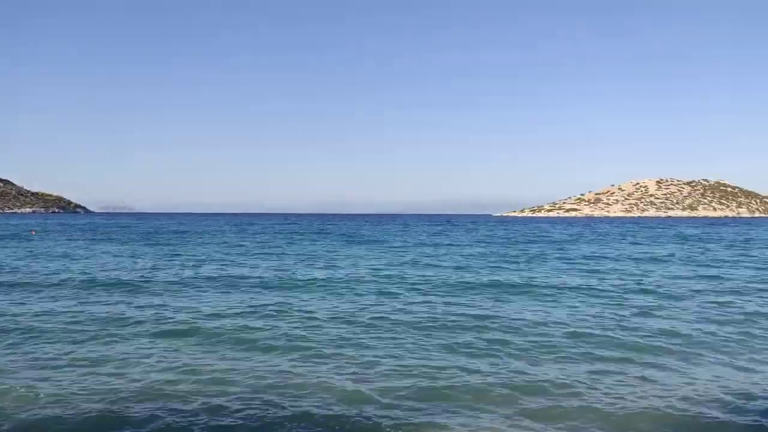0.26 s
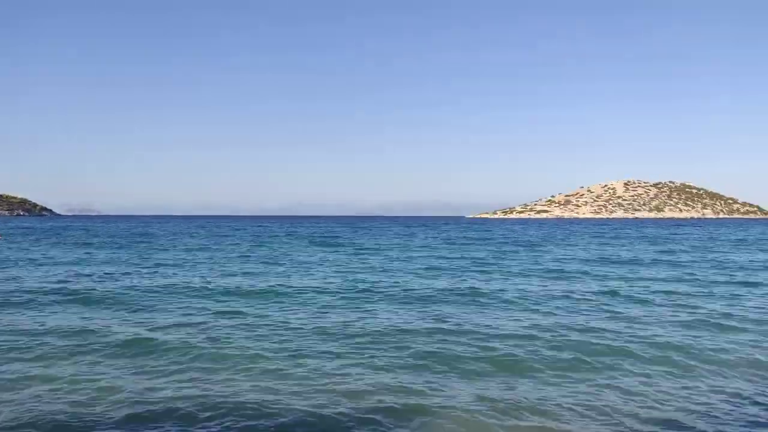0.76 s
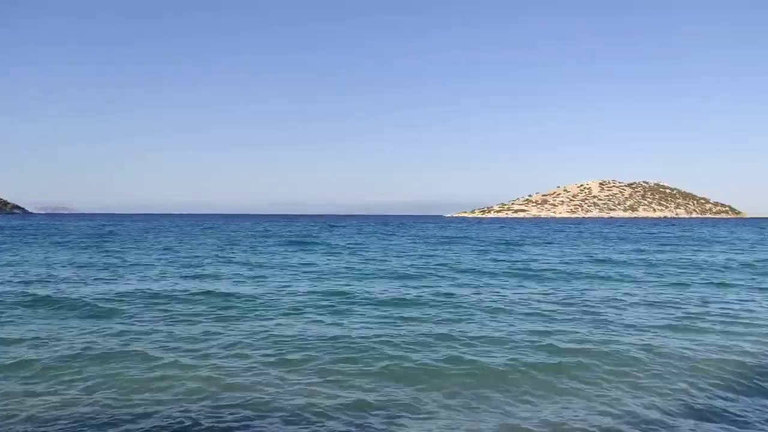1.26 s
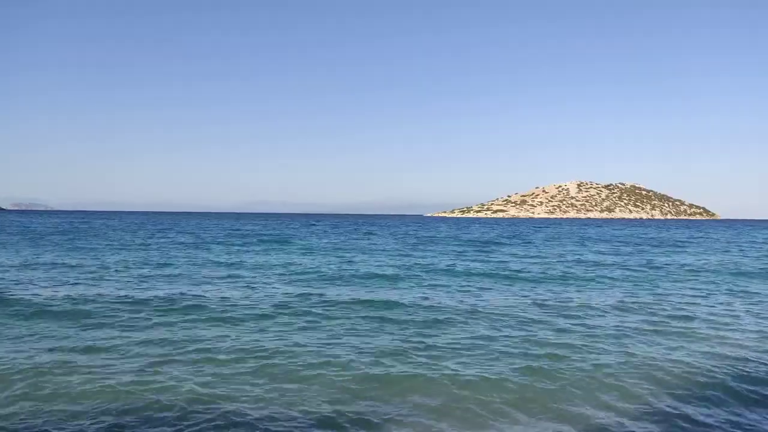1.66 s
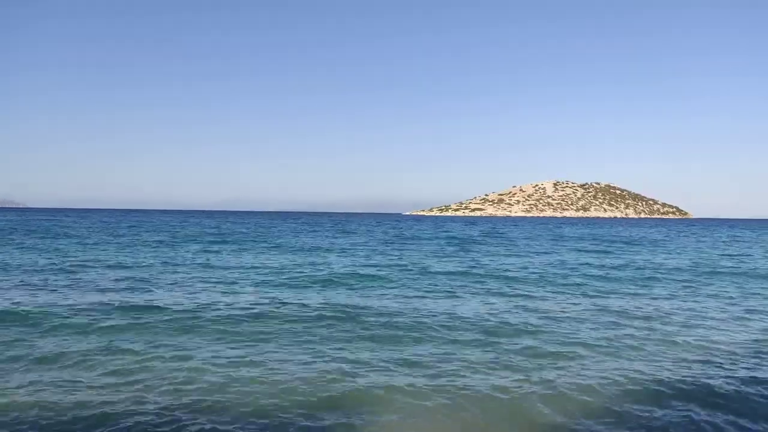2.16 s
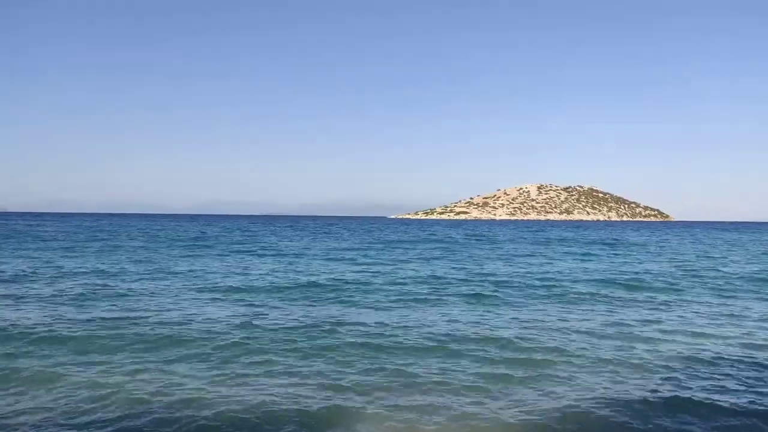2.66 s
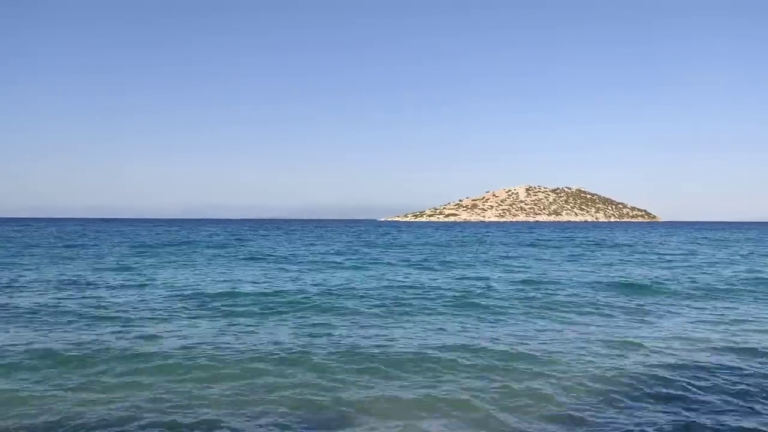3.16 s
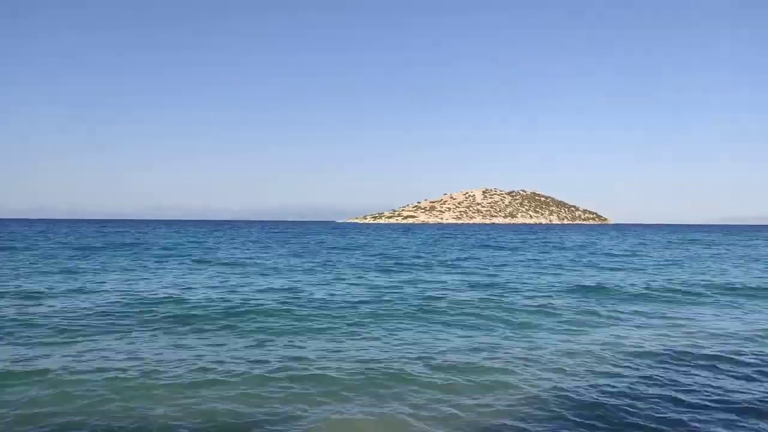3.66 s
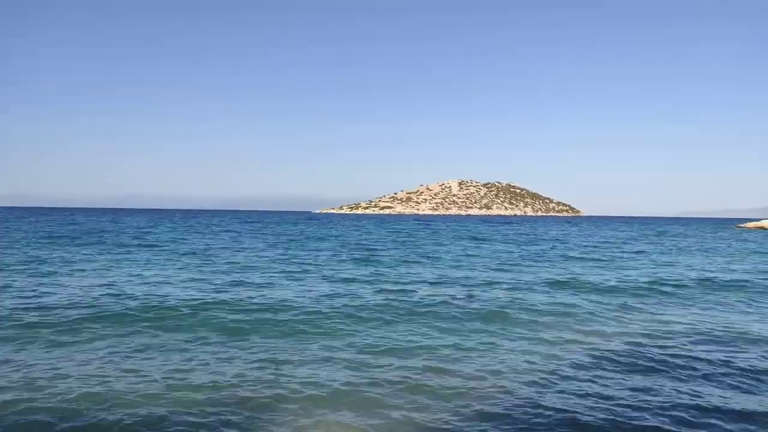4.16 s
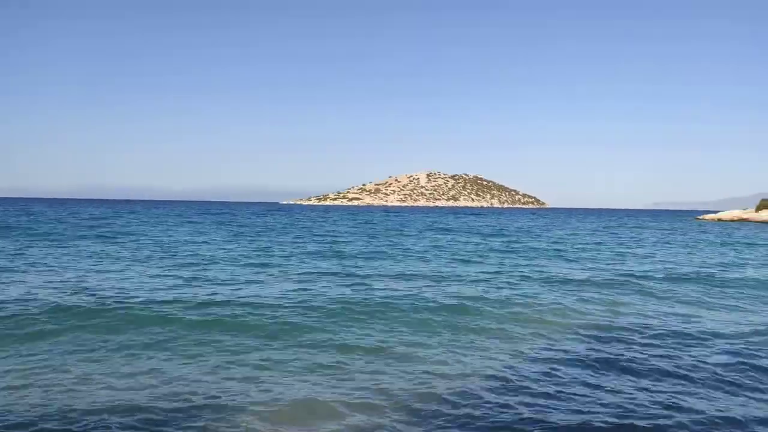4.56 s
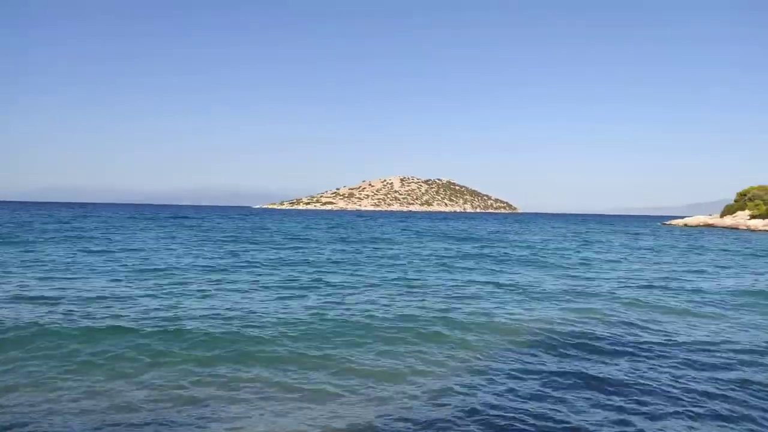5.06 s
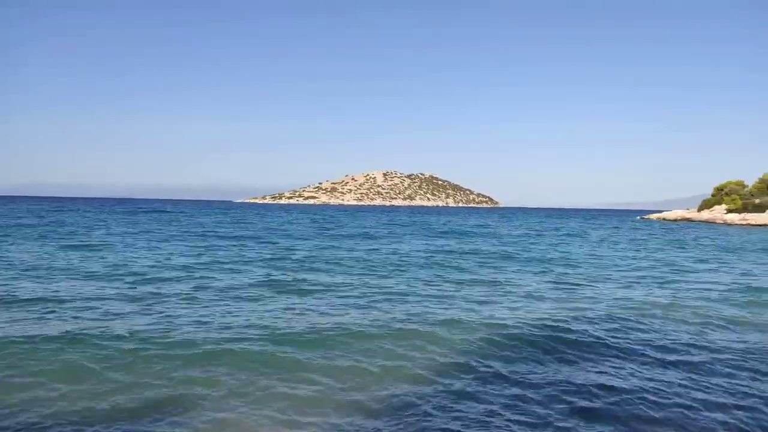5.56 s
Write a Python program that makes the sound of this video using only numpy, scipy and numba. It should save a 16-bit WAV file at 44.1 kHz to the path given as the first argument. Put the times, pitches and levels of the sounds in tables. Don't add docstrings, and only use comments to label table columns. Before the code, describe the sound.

Open seaside, no voices. Pebbles tick mostly on the right over nearly still water, then a soft bubbling rush grows on the left and subsides, leaving a few hard stone knocks. Fizzing foam leads into a second wave with sudden slaps and a deep gurgling plop around four and a half seconds. The wash moves to the right as it fades, with weak low wind thuds on the phone microphones.

```python
import sys
import numpy as np
from scipy import signal
from scipy.fft import rfft, irfft
from scipy.io import wavfile
from scipy.ndimage import uniform_filter1d
from numba import njit

SR = 44100
rng = np.random.default_rng(int(sys.argv[2]) if len(sys.argv) > 2 else 0)


def generate_wav(sig):
    pcm = np.round(np.clip(np.atleast_2d(sig).T, -1, 1) * 32767).astype(np.int16)
    wavfile.write(sys.argv[1], SR, pcm)


def rack_gain(trim_db):
    fader = np.asarray(trim_db, float)
    return 10 ** (fader / 20)


N = 256662
TIME = np.arange(N) / SR

# t/s, delay of the left port/ms
SHORE = [
    (0, -0.47),
    (1.2, -0.59),
    (2, -0.48),
    (3.4, -0.56),
    (4.2, -0.39),
    (4.7, -.3),
    (5.2, 0.43),
    (5.82, 0.53),
]


def surf():
    # lowest f/Hz, highest f/Hz, rate/(1/s), ring/cycles, size scatter/dB, share of shore delay/1,
    # spread of delay/ms, patchiness/dB
    crowds = [
        (64.2, 583, 1400, 6.8, 1.2, 0.034, 0.75, 2.3),
        (519, 1268, 3500, 8.9, 1, 0.85, 0.5, 1.3),
        (1200, 3010, 8000, 8.6, 2, 0.88, 0.82, 1.54),
        (2830, 9720, 20000, 7.8, 2.5, 1.1, 1.53, 2.24),
        (10570, 15700, 12000, 30, 1.5, 0.12, .2, 3),
    ]
    # from crest/dB, from foam/dB, from far shore/dB, delay/s
    feeds = [
        (-2.45, -35, -45.5, -0.026),
        (-1.13, -24, -57, 0.0087),
        (-2.5, -9, -46.5, 0.031),
        (-13, -0.34, -49, -0.0015),
        (-5.5, -40, -58, 0.029),
    ]
    # t/s, crest level/dB, level of foam running up the pebbles/dB
    waves = [(0, -45.5, -40), (.25, -48.5, -38), (.8, -47.5, -39), (1.3, -36.5, -32.5), (1.81, -28.5, -24),
             (2.17, -27.5, -23.5), (2.27, -30, -26), (2.46, -30, -25.5), (2.642, -34, -32),
             (3.04, -41.5, -40.5), (3.34, -45.5, -36), (3.7, -48, -28.5), (4.18, -31, -28),
             (4.55, -29, -25), (4.9, -32, -27), (5.22, -34.5, -34), (5.58, -36, -38.5),
             (5.82, -33.5, -33.5)]
    # t/s, extra level/dB, half length/s, bubble f/Hz
    splashes = [(0.258, 5, 0.024, 695), (1.285, 2.5, 0.77, 194), (1.575, 5, 0.015, 800),
                (1.75, 3, .04, 1280), (1.976, 3, 0.2, 190), (1.907, 1.5, 0.044, 1900),
                (2.137, 1.5, 0.02, 1500), (2.42, 1, 0.046, 1500), (2.703, 5, 0.44, 1160),
                (3.748, 4, 0.09, 190), (4.17, 15, 0.018, 400), (4.23, 4, 0.021, 404),
                (4.295, 13, 0.02, 300), (4.53, 4.5, 0.15, 170), (4.59, 3.5, 0.029, 2200),
                (4.744, 5.5, 0.12, 189), (5.476, 4, 0.011, 1950), (5.538, 7, 0.52, 257),
                (5.81, 0.5, .08, 188)]
    reach_octaves = 0.7

    t, crest_db, foam_db = np.transpose(waves)
    splash_t, extra_db, half_s, splash_hz = np.transpose(splashes)
    bursts = bump(splash_t, half_s)
    layers = []
    for row, (from_crest, from_foam, far_db, late_s) in zip(crowds, feeds):
        crest = rack_gain(np.interp(TIME - late_s, t, crest_db + from_crest))
        foam = rack_gain(np.interp(TIME - late_s, t, foam_db + from_foam))
        swell = np.sqrt(crest ** 2 + foam ** 2 + rack_gain(far_db) ** 2)
        centre_hz = np.sqrt(row[0] * row[1])
        reach = np.exp(-(np.log2(splash_hz / centre_hz) / reach_octaves) ** 2)
        layers.append(crowd(*row) * swell * rack_gain((extra_db * reach) @ bursts))

    foam_excess_db = np.interp(TIME, t, foam_db - crest_db)
    delay_ms = np.interp(TIME, *np.transpose(SHORE))
    pan_db = 1.4 - 0.16 * foam_excess_db + 1.13 * delay_ms
    layers[3] = layers[3] * rack_gain(np.array([[.5], [-.5]]) * pan_db)
    return sum(layers)


def crowd(lo_hz, hi_hz, rate, cycles, scatter_db, share, spread_ms, patchy_db):
    moment, pitch, place, loudness, length, side = rng.random((int(rate * N / SR), 6)).T
    hz = lo_hz * (hi_hz / lo_hz) ** pitch
    aside = (2 * place - 1) * abs(2 * place - 1)
    shore_ms = np.interp(moment * N / SR, *np.transpose(SHORE))
    lag = (share * shore_ms + spread_ms * aside) * SR / 1000
    size = hz * rack_gain(scatter_db * np.minimum(-np.log(1 - loudness), 6.5))
    near = rack_gain(1.6 * (2 * side - 1))
    sizes = np.array([size * near, size / near])
    dry = ring(moment * N, lag, hz, cycles * (.5 + length), sizes, 0.21)
    edge = signal.butter(3, [lo_hz * 0.75, hi_hz * 1.05], "band", fs=SR, output="sos")
    patches = (drift(8.2) + drift(30.09)) / 2.5
    return unit(ports(signal.sosfilt(edge, dry))) * rack_gain(patchy_db * patches)


@njit
def ring(start, lag, hz, cycles, size, glide):
    out = np.zeros((2, N))
    for g in range(len(start)):
        n = int(cycles[g] * SR / hz[g]) + 2
        turn = np.exp(2j * np.pi * hz[g] / SR - 6.0 / n)
        fast = np.exp(-18.0 / n)
        rise = np.exp(2j * np.pi * hz[g] / SR * glide / n)
        for c in range(2):
            at = start[g] + (.5 - c) * lag[g]
            first = int(at) + 1
            z = size[c, g] * turn ** (first - at)
            step = turn
            unswollen = 1.
            for k in range(max(first, 0), min(first + n, N)):
                out[c, k] += z.imag * (1 - unswollen)
                z = z * step
                step = step * rise
                unswollen = unswollen * fast
    return out


def ports(x):
    # f/Hz, level/dB
    left_port = [(90, -11), (170, 5.5), (350, 7), (600, 0), (1050, 1.5), (2000, 4), (2600, -2.5),
                 (4000, -11), (6500, -10), (8000, -4.5), (8900, 0.5), (9500, -7.5), (10300, -28),
                 (15500, -48.5)]
    right_port = [(90, -18), (170, 2), (400, 2.5), (620, -4), (1000, -0.3), (1900, 5), (2600, -3),
                  (4300, -6), (6800, -3), (7700, 6), (8400, -2), (9000, -7.5), (9800, -31), (15500, -46.5)]
    hz = np.arange(1025) * SR / 2048
    out = []
    for table, ch in zip((left_port, right_port), x):
        f, db = np.transpose([(5.3, -11)] + table)
        gain = rack_gain(np.interp(np.log(hz + 1), np.log(f), db))
        cep = irfft(np.log(gain))
        cep[1:1024] *= 2
        cep[1025:] = 0
        response = irfft(np.exp(rfft(cep)))
        out.append(signal.fftconvolve(ch, response)[:N])
    return np.array(out)


def unit(x):
    return x / np.sqrt(np.mean(np.mean(x, axis=0) ** 2))


def drift(rate):
    k = int(SR / rate)
    held = np.repeat(rng.standard_normal(N // k + 1), k)
    return 1.14 * uniform_filter1d(uniform_filter1d(held, k), k)[:N]


def bump(s, half_s):
    return np.exp(-((TIME - np.c_[s]) / np.c_[half_s]) ** 2)


def knocks():
    # t/s, peak level/dB, left minus right/dB
    pebbles = [(0.0473, -23.5, -10), (0.1224, -22, -4.5), (0.208, -21, -9), (0.271, -19, -7.0),
               (0.2942, -23, -6.5), (0.316, -21, -11), (0.3556, -20, -11), (0.6509, -25, -5.5),
               (0.7572, -26, -6.0), (0.8844, -21, -12), (0.918, -21, -15), (1.0256, -24, -3.5),
               (1.0859, -24, -6.5), (1.0989, -21, -10), (1.15, -17, -12), (1.2815, -19, -5.5),
               (1.3074, -18, -7), (1.3598, -17.5, -5.5), (2.5726, -12, 2), (2.6785, -21, -6.0),
               (2.7686, -12.5, 4), (2.8, -16, -5.0), (2.9677, -23, -3.5), (3.03, -10, -4),
               (3.6142, -24, -6.5), (3.6735, -16, -9), (3.705, -18, -8.0), (.2245, -21, -9),
               (3.7545, -16, -9), (3.7903, -10, -14)]
    stone_hz, stone_cycles, stone_db = 5750, 9.8, -6
    t, db, pan_db = np.transpose(pebbles)
    one = np.ones(len(t))
    lag = rng.uniform(-19.0, -12.0, len(t))
    size = rack_gain(db + 7.5 + np.array([pan_db, -pan_db]) / 2)
    start = t * SR + 10
    out = []
    for c, cavity_hz in enumerate((8800, 7750)):
        clack = ring(start, lag, stone_hz * one, stone_cycles * one, size * rack_gain(stone_db), 0.)[c]
        cavity = ring(start, lag, cavity_hz * one, 20 * one, size, 0.)[c]
        out.append(cavity + clack)
    return signal.sosfilt(signal.butter(4, [3600, 9300], "band", fs=SR, output="sos"), out)


def gulps():
    # t/s, peak level/dB, f/Hz, ring/cycles
    pockets = [(0.246, -27.5, 710, 14), (1.562, -24, 840, 10), (1.70, -37, 700, 12),
               (4.153, -17.5, 716, 14), (4.509, -10, 190, 12), (4.527, -7, 167.4, 15),
               (4.551, -11.5, 337, 10), (4.586, -9.5, 1740, 25), (4.805, -20, 774, 13)]
    t, db, hz, cycles = np.transpose(pockets)
    size = rack_gain(db + 2.5 + np.array([[2.2], [-2.2]]))
    dry = ring(t * SR, 4 + 0 * t, hz, cycles, size, .03)
    return signal.sosfilt(signal.butter(2, [120, 2200], "band", fs=SR, output="sos"), dry)


def wind():
    # t/s, peak level/dB, half length/s
    gusts = [
        [(.1, -54, .08), (.83, -45, .07), (2.4, -62, .3), (3.72, -51, 0.13), (4.45, -53, 0.28), (5.12, -40, .12), (5.45, -41, 0.19), (5.68, -38, 0.043), (5.8, -46, 0.083)],
        [(.06, -40, 0.082), (.6, -56, 0.079), (.72, -51, 0.044), (1.1, -49, 0.11), (2.56, -62, 0.082), (4.45, -59, 0.25), (5.1, -54, 0.078), (5.5, -45, 0.028), (5.7, -56, 0.22)],
    ]
    breeze_db = -62
    band = signal.butter(1, [22, 65], "band", fs=SR, output="sos")
    low = signal.sosfilt(band, rng.standard_normal((2, N)))
    low = signal.sosfilt(signal.butter(2, 160, fs=SR, output="sos"), low)
    out = []
    for ch, table in zip(low, gusts):
        t, db, half_s = np.transpose(table)
        push = rack_gain(breeze_db) + rack_gain(db) @ bump(t, half_s)
        out.append(ch / ch.std() * push * rack_gain(7.1 * drift(16)))
    return np.array(out)


def boat():
    engine_hz, engine_db, pan_db = 37.7, -57, 2
    level = np.sqrt(2) * rack_gain(engine_db + 1.2 * drift(2.7))
    phase = 2 * np.pi * np.cumsum(engine_hz * (1 + 0.007 * drift(2.15))) / SR
    return level * np.sin(phase) * rack_gain(np.array([[.5], [-.5]]) * pan_db)


def scene():
    return surf() + knocks() + gulps() + wind() + boat()


def roll_off(x):
    return signal.sosfilt(signal.butter(12, 15720, fs=SR, output="sos"), x)


def record(dry):
    mix = np.ascontiguousarray(dry)
    return roll_off(mix)


dry = scene()
out = record(dry)
generate_wav(out)
```